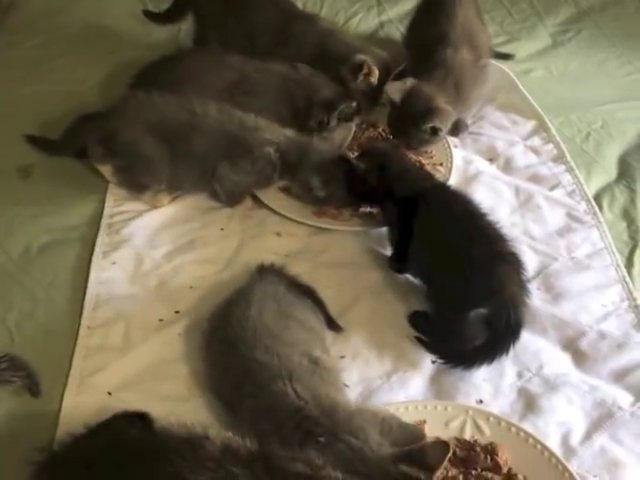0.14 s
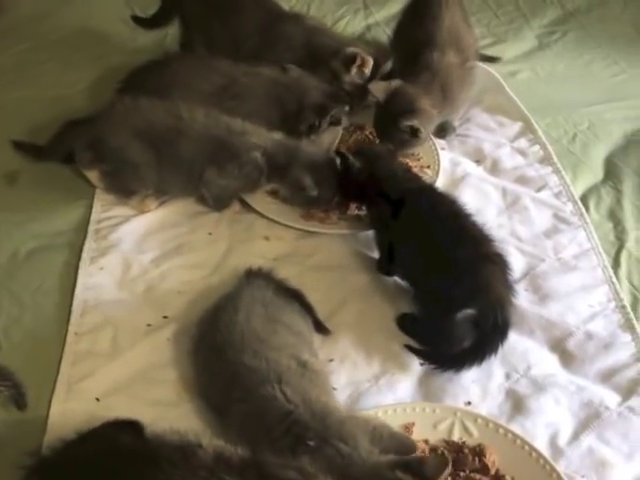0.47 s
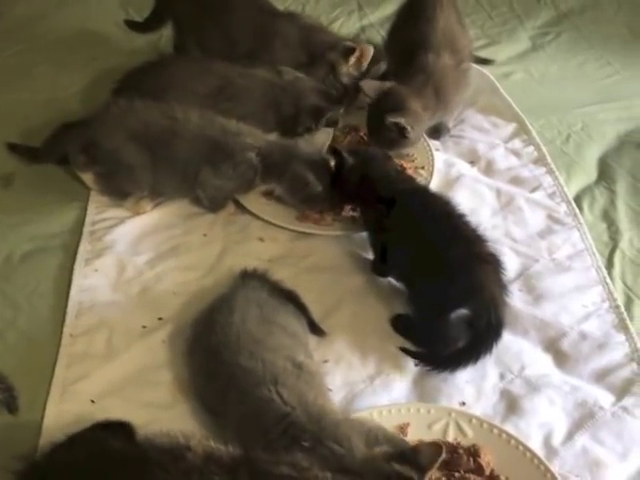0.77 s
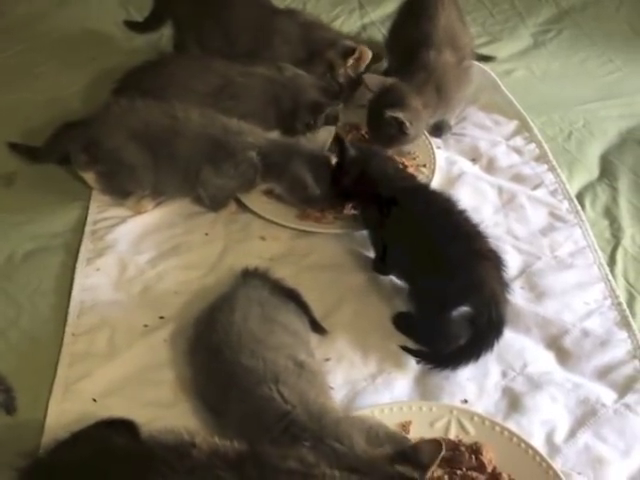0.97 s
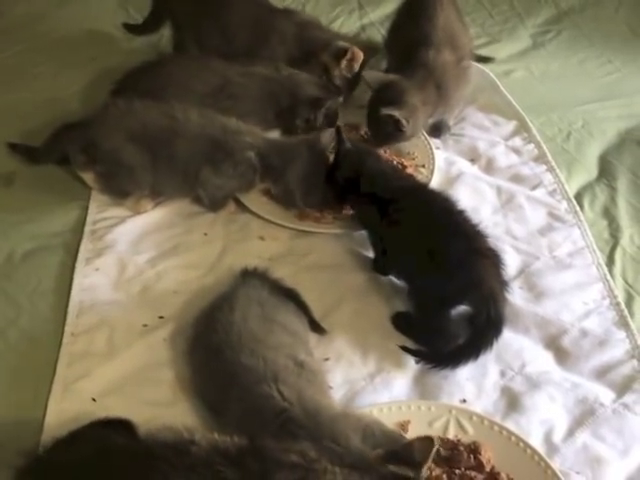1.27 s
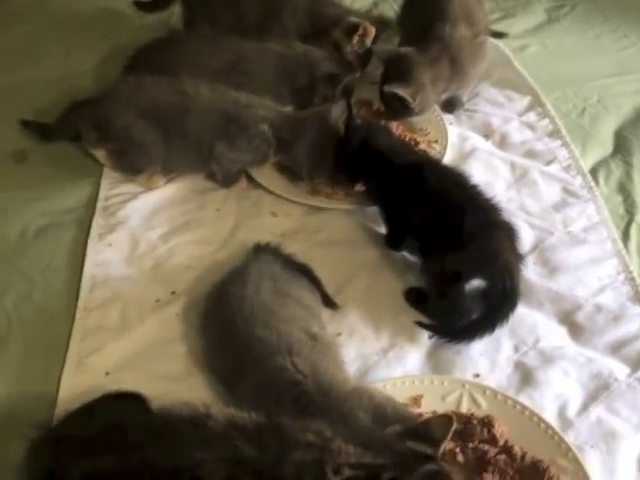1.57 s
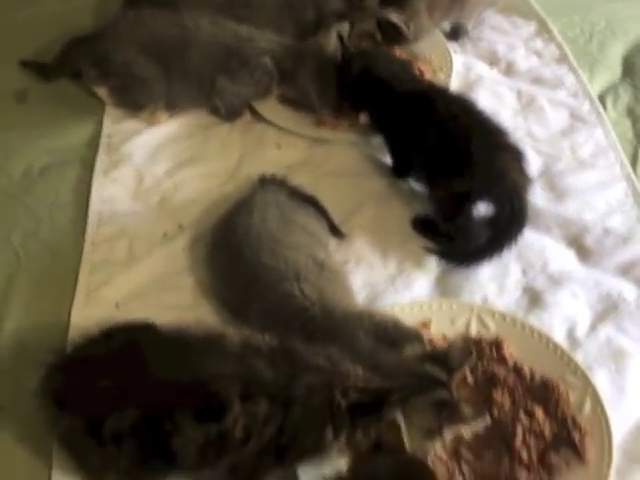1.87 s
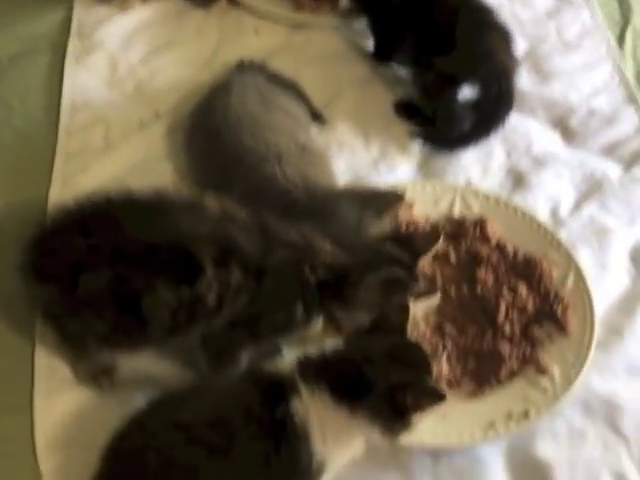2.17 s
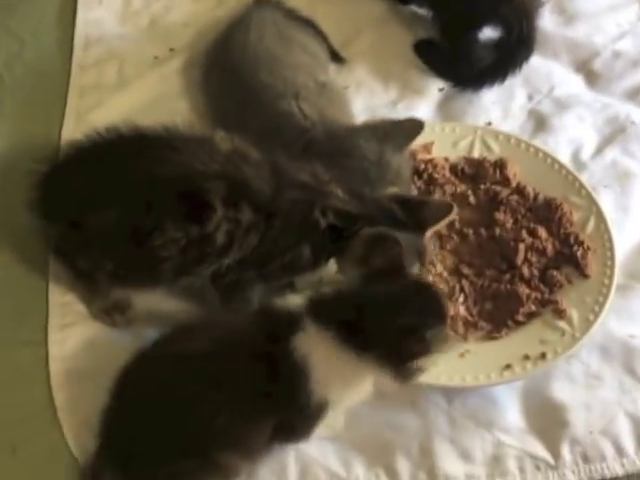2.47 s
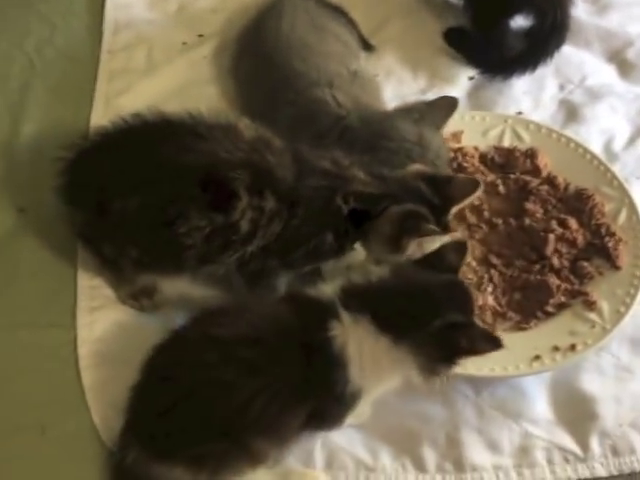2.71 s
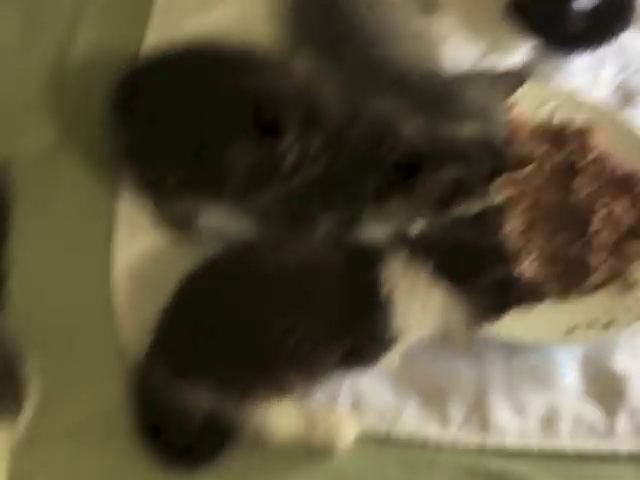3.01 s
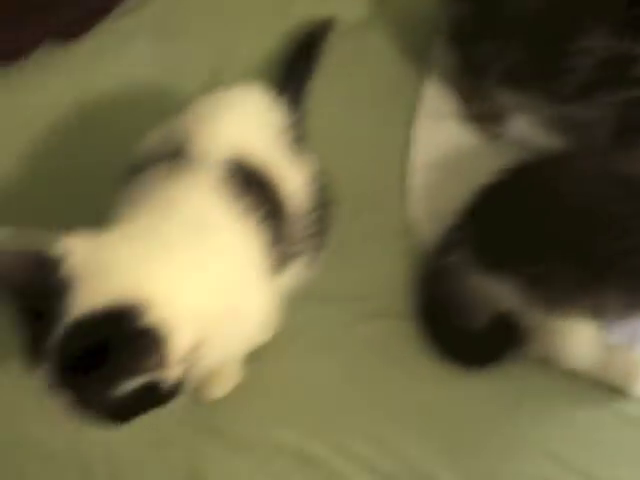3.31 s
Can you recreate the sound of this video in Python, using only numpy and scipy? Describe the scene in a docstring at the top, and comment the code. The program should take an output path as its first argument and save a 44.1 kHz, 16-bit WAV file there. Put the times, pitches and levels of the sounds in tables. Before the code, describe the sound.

Wet eating sounds of kittens, clicking, squelching and nibbling close up in a small humming room

```python
"""Kittens eat wet food from plates on the floor of a small room, close to a hand-held camera.
From the start an appliance hums in wavering lines over noise rumble and hiss, with faint random nibbling.
Bursts of tiny pops make clicks and smacks, gliding bubbles squelch, and short noise knocks nudge the plates.
Bites snap in damped resonances near 1.0, 2.5 and 3.2 s; the hum sinks after 1.9 s as the camera moves away,
and a dull noise rustle joins at 3.0 s. The floor and the walls answer every sound of the kittens."""
import sys
import numpy as np
from scipy import signal
from scipy.fft import rfft, irfft, next_fast_len
from scipy.io import wavfile
from scipy.ndimage import map_coordinates

SR = 44100
rng = np.random.default_rng(int(sys.argv[2]) if len(sys.argv) > 2 else 0)


def store_pcm(level_fs):
    """Save levels as 16-bit WAV."""
    pcm = np.round(np.clip(level_fs, -1, 1) * 32767).astype(np.int16)
    wavfile.write(sys.argv[1], SR, np.atleast_2d(pcm).T)


N = 152145
T = np.arange(N) / SR

# Steady lines of the appliance. Each row: frequency in Hz, rms level in dB.
HUM_LINES = [(59, -47), (120, -44), (221.5, -60.5), (240, -58), (304, -73), (341, -65), (397.5, -75.5),
             (480, -78), (599.5, -73)]
# Fade of those lines as the camera moves away. Each row: time in seconds, gain in dB.
HUM_FADE = [(0, 0), (1.0, 0.5), (1.9, 0), (2.7, -1.9), (3.45, -3.5)]
# Colour of the appliance's rumble. Each row: frequency in Hz, relative level in dB.
RUMBLE_COLOUR = [(20, -35), (32, -16), (42, 0), (56, 6), (75, -4.5), (108, 3.5), (135, -6.5), (168, -3.5),
                 (190, -9), (220, -5.5), (260, -12), (315, -5), (390, -14), (450, -20.5), (700, -27.5),
                 (1500, -36.5)]
# Colour of the room and microphone hiss. Each row: frequency in Hz, relative level in dB.
HISS_COLOUR = [(100, -12.5), (600, 2.5), (1200, 7), (2100, 5), (3000, 6.5), (6000, -3), (9000, -8.5),
               (11000, -7), (15500, -7)]
# Rustle as the camera swings away. Each row: time in seconds, level in dB.
SWING_LEVEL = [(3.0, -68), (3.2, -55), (3.3, -58), (3.45, -62)]
# Soft knocks of paws and muzzles against plate and sheet.
# Each row: start in seconds, decay in seconds, level in dB of the noise before its envelope.
NUDGES = [(.085, 0.011, -48.5), (.568, .006, -61), (.747, 0.017, -49), (1.853, 0.0057, -45),
          (2.598, 0.0045, -47), (2.674, 0.018, -57), (2.912, 0.032, -49), (3.184, 0.0067, -36.5),
          (3.334, 0.0056, -40), (3.372, 0.014, -44.5)]
# Squelches in the mouth. Each row: start in seconds, length in seconds, first pitch in Hz,
# last pitch in Hz, level in dB as an rms over that length.
SQUELCHES = [(.083, .011, 3880, 3830, -33.5), (0.153, .035, 2150, 2010, -49.5),
             (.397, 0.006, 2800, 2520, -47.5), (0.426, 0.033, 1920, 1740, -53),
             (0.488, 0.042, 5400, 5200, -60), (0.52, 0.027, 3460, 3340, -53), (0.582, .02, 1790, 1950, -56),
             (0.616, 0.033, 7400, 7500, -59.5), (0.769, 0.033, 2200, 2100, -58),
             (1.095, .035, 2250, 2140, -47.5), (1.278, 0.036, 2540, 2170, -52),
             (1.312, 0.025, 2030, 1860, -45.5), (1.351, 0.015, 3100, 3300, -46),
             (1.357, .018, 1880, 1860, -52), (1.382, 0.034, 2280, 2150, -50.5),
             (1.642, 0.008, 2850, 3160, -44.5), (1.724, .035, 2540, 2270, -53),
             (1.768, 0.053, 2240, 1990, -50), (1.776, 0.051, 1630, 1340, -53.5),
             (1.835, 0.031, 2240, 2050, -52), (1.916, 0.0091, 3020, 3200, -44),
             (1.943, 0.06, 3150, 2940, -52), (2.202, .05, 2300, 2050, -59.5),
             (2.228, .004, 2180, 1880, -46), (2.293, .03, 1920, 1860, -56.5),
             (2.44, 0.035, 3700, 3700, -57), (2.782, .022, 3180, 3360, -53.5),
             (2.799, .07, 2220, 2100, -53.5), (3.13, 0.011, 3180, 3400, -42.5),
             (3.138, 0.035, 3700, 3540, -48), (3.288, 0.0057, 2600, 2750, -41.5),
             (3.368, 0.011, 1510, 1960, -39.5)]
# The four bands of a mouth sound. Each row: low edge in Hz, high edge in Hz.
MOUTH_BANDS = [(1450, 2540), (3200, 5080), (5300, 9620), (9800, 14800)]
# Wet smacks, and a few brief clicks that lead into or follow the loud bites. Each row: start in seconds, decay
# in seconds, then the level in dB of each mouth band from low to high, as an rms over one decay time.
SMACKS = [(.063, 0.024, -50.5, -47, -55, -51), (.082, 0.0085, -45, -45, -43.5, -36.5),
          (0.331, 0.013, -53.5, -51.5, -55, -67), (.635, 0.035, -54.5, -59, -68, -70),
          (0.745, 0.015, -41.5, -48, -56.5, -54.5), (0.799, 0.013, -51.5, -67, -58, -56),
          (.91, .012, -60, -56, -58, -68), (.955, 0.0057, -51, -56, -56, -51),
          (0.9869, 0.0022, -28, -33, -35, -42), (1.008, 0.0049, -46, -46, -41, -53),
          (1.09, 0.029, -54, -58, -59, -54.5), (1.43, 0.023, -58.5, -51.5, -73, -71),
          (1.509, 0.012, -57, -50, -55.5, -60), (1.568, 0.0089, -59, -52.5, -73, -72),
          (1.685, 0.007, -47.5, -47, -53, -48), (2.493, 0.0015, -51, -48, -53, -46),
          (2.667, 0.016, -44.5, -48, -52.5, -53), (2.912, 0.02, -40.5, -73, -61, -49.5),
          (3.035, 0.02, -55, -52.5, -56, -62), (3.135, 0.0059, -47, -56, -56, -58),
          (3.1653, 0.0017, -43, -52, -46, -53), (3.178, 0.0015, -34, -44, -37, -59),
          (3.182, 0.005, -42.5, -38, -35, -35.5), (3.356, 0.012, -49.5, -46.5, -45.5, -57),
          (3.375, 0.018, -43, -47.5, -54.5, -55)]
# Tongue and tooth clicks. Each row: start in seconds, a peak level in dB that is not used,
# then the level in dB of each mouth band from low to high, as an rms over one decay time.
CLICKS = [(0.2369, -38, -45.5, -43.5, -76, -84), (0.3146, -33, -43, -36, -42, -51),
          (0.352, -31, -47, -60, -39, -48), (0.3614, -34, -56, -72, -45.5, -36.5),
          (0.5657, -36, -40.5, -53, -45, -47), (0.6926, -36, -44.5, -43.5, -47, -49),
          (0.8637, -35, -41, -50, -49, -64), (0.9865, -13, -38, -42, -30.5, -20.5),
          (1.262, -34, -72, -75, -57, -42.5), (1.3412, -31, -59, -45, -41, -51),
          (1.5051, -38, -49.5, -42.5, -51, -50), (1.6596, -29, -49, -37, -37, -37),
          (1.6844, -30, -54, -36, -36, -48), (1.8525, -39, -42, -48, -48, -48),
          (2.0242, -34, -46, -39.5, -38, -40.5), (2.0421, -27, -45, -35, -40.5, -55),
          (2.163, -39, -77, -81, -55, -46.5), (2.1874, -41, -71, -67, -48, -66),
          (2.336, -38, -64, -44.5, -57, -49), (2.4992, -16, -48.5, -28, -47, -47),
          (2.595, -42, -46, -72, -69, -68), (2.7551, -39, -48, -44, -66, -72),
          (2.8552, -29, -46, -39.5, -38, -39.5), (2.9066, -24, -33.5, -29.5, -41, -37),
          (2.9184, -25, -36, -37.5, -43, -42), (2.9841, -38, -41, -62, -51, -47),
          (3.1035, -36, -46.5, -38.5, -61, -56), (3.1802, -13, -30, -27.5, -24, -49),
          (3.3, -30, -56, -54, -36, -36.5), (3.3343, -36, -41.5, -46, -44, -45)]
# Resonances rung by the loud bites. Each row: start in seconds, frequency in Hz,
# level in dB before attack and doubling, time in seconds to fall by 60 dB.
BITE_RINGS = [(0.9871, 1837, -20, 0.0086), (.9875, 2520, -21.5, 0.0057), (.9876, 8450, -16.5, 0.0041),
              (.9875, 6810, -24, 0.005), (.9914, 11600, -11.5, 0.0043), (1.0078, 8100, -30.5, 0.014),
              (2.4993, 2400, -26.5, 0.0092), (2.4996, 3980, -23, 0.0084), (2.5003, 4470, -20, 0.0075),
              (2.4992, 5670, -19, 0.01), (2.4993, 8240, -23, 0.0048), (2.504, 4270, -17.5, 0.0072),
              (3.1797, 8440, -16.5, 0.0056), (3.1806, 7990, -14.5, 0.0064), (3.183, 5600, -5, 0.002),
              (3.183, 1450, -29, 0.013), (3.1859, 1900, -18, 0.0035), (3.1852, 6920, -15, 0.0041),
              (3.1856, 5250, -15.5, 0.0034)]
# Decay of the room. Each row: frequency in Hz, time in seconds to fall by 60 dB.
ROOM_DECAY = [(300, 0.1), (2000, 0.28), (6000, 0.24), (14000, 0.18)]
# Tone of the small microphone. Each row: frequency in Hz, gain in dB.
MICROPHONE_TONE = [(20, 6), (40, -0.5), (1000, -0.5), (2400, -2.5), (2950, -7.5), (3800, -4.5),
                   (9300, -1.5), (10500, -7.5), (11800, -3.5), (14000, -10), (15900, -8)]

HUM_WAVER_DB, HUM_DRIFT_RAD = 0.5, 0.04
RUMBLE_DB, HISS_DB = -46, -57.5
NIBBLES_PER_S, NIBBLE_DB, NIBBLE_HZ = 52, -64, 7000
MUNCHES_PER_S, MUNCH_DB, MUNCH_HZ = 160, -69.5, 2034
BUBBLES_PER_S, BUBBLE_SCATTER, BUBBLE_CYCLES, BUBBLE_SPREAD_DB = 420, 0.061, 5.5, 3.5
POPS_PER_S, POP_SPREAD_DB = 1300, 4.5
SOFT_RISE_S = 0.0038  # shared by smacks and nudges
CLICK_RISE_S, CLICK_DECAY_S = 0.0011, 0.0014
BITE_RISE_S, BITE_ROUGH_RAD, BITE_ROUGH_PER_S = 0.00062, 0.23, 1455
FLOOR_S, FLOOR_DB, ROOM_DB = 0.0044, -11.5, -9
TOP_HZ = 15900  # band limit of the camera


def amp(db):
    """Turn decibels into gain."""
    return 10 ** (np.asarray(db) / 20)


def unit(x):
    """Scale a sound to rms 1."""
    return x / np.sqrt(np.mean(x ** 2) + 1e-20)


def along(points, hz):
    """Read a curve of frequency points on a log axis."""
    f, v = np.transpose(points)
    return np.interp(np.log(hz + 1), np.log(f + 1), v)


def wobble(rate, times=T):
    """Draw a smooth random curve with the given number of knots a second."""
    knots = rng.standard_normal(int(len(times) * rate / SR) + 4)
    return map_coordinates(knots, [times * rate])


def filtered(x, response):
    """Shape a sound by a gain that depends on frequency."""
    m = next_fast_len(N + SR // 2)
    return irfft(rfft(x, m) * response(np.fft.rfftfreq(m, 1 / SR)), m)[:N]


def noise(colour):
    """Make coloured noise of rms 1."""
    return unit(filtered(rng.standard_normal(N), lambda hz: amp(along(colour, hz))))


def band(x, edges):
    """Keep one band, filtering forward in time only."""
    return signal.sosfilt(signal.butter(3, edges, 'bandpass', fs=SR, output='sos'), x)


def add(track, s, sound):
    """Mix a sound into the track at s seconds."""
    part = track[max(round(s * SR), 0):][:len(sound)]
    part += sound[:len(part)]


def grains(times, hz, gains, cycles, size=500):
    """Ring damped sines that fall by 1/e in the given number of cycles."""
    k = np.arange(size)
    turns = hz[:, None] * k / SR
    envelope = np.exp(-turns / cycles) * (1 - np.exp(-2 * turns))
    waves = gains[:, None] * np.sin(2 * np.pi * turns) * envelope
    positions = (times * SR).astype(int)[:, None] + k
    return np.bincount(positions.ravel(), waves.ravel(), N)[:N]


def hiss():
    """Room and microphone give a steady coloured noise."""
    return amp(HISS_DB) * noise(HISS_COLOUR)


def appliance():
    """Motor and mains lines waver slightly in level and phase over a low noise rumble."""
    lines = np.zeros(N)
    for hz, db in HUM_LINES:
        gain = amp(db + HUM_WAVER_DB * wobble(4.68)) * np.sqrt(2)  # rms to peak
        phase = 2 * np.pi * (hz * T + rng.random()) + HUM_DRIFT_RAD * wobble(2.9)
        lines += gain * np.sin(phase)
    fade = amp(np.interp(T, *np.transpose(HUM_FADE)))
    return lines * fade + amp(RUMBLE_DB) * noise(RUMBLE_COLOUR)


def handling():
    """The hand on the turning camera rubs out a dull band of noise."""
    level = amp(np.interp(T, *np.transpose(SWING_LEVEL), left=-120))
    return level * unit(band(rng.standard_normal(N), (170, 455)))


def litter(rate, centre_hz, scatter, cycles):
    """Faint mouth sounds are short damped rings at random moments, pitches and strengths."""
    when, pitch, strength = rng.random((int(rate * N / SR), 3)).T
    hz = np.minimum(centre_hz * np.exp(scatter * (2 * pitch - 1)), TOP_HZ)
    gains = amp(np.log(strength))  # mostly within a few dB of the strongest
    return unit(grains(when * N / SR, hz, gains, cycles))


def other_kittens():
    """The other kittens tick brightly with nibbles and chew in a lower, denser patter."""
    nibbles = litter(NIBBLES_PER_S, NIBBLE_HZ, scatter=1.0, cycles=2.25)
    munching = litter(MUNCHES_PER_S, MUNCH_HZ, scatter=0.26, cycles=1)
    return amp(NIBBLE_DB) * nibbles + amp(MUNCH_DB) * munching


def nudges():
    """Dull, brief knocks are bursts of band noise without any ring."""
    out, t = np.zeros(N), np.arange(SR // 8) / SR
    for s, decay_s, db in NUDGES:
        shape = (1 - np.exp(-t / SOFT_RISE_S)) * np.exp(-t / decay_s)
        thud = unit(band(rng.standard_normal(len(t)), (590, 1340)))
        add(out, s, amp(db) * shape * thud)
    return out


def squelches():
    """Tiny bubbles ring a mouth cavity whose pitch glides as the jaw moves."""
    out = np.zeros(N)
    for s, length, first_hz, last_hz, db in SQUELCHES:
        count = max(int(length * BUBBLES_PER_S), 2)
        place = (np.arange(count) + rng.random(count)) / count  # one bubble in each equal slice
        glide = first_hz + (last_hz - first_hz) * place
        hz = glide * np.exp(BUBBLE_SCATTER * rng.standard_normal(count))
        gains = amp(BUBBLE_SPREAD_DB * rng.standard_normal(count))
        run = grains(s + place * length, hz, gains, BUBBLE_CYCLES)
        out += amp(db) * unit(run) * np.sqrt(length * SR / N)
    return out


def wet_burst(rise_s, decay_s, levels_db, size=6000):
    """A film of moisture tears in a dying run of tiny pops, coloured by the mouth."""
    t = np.arange(size) / SR
    struck = rng.random(size) < POPS_PER_S / SR
    pops = struck * rng.choice([-1, 1], size) * amp(POP_SPREAD_DB * rng.standard_normal(size))
    shape = (1 - np.exp(-t / rise_s)) * np.exp(-t / decay_s)
    tear = (pops + 0.14 * rng.standard_normal(size)) * shape  # a little breath of noise between pops
    coloured = sum(amp(db) * unit(band(tear, edges)) for edges, db in zip(MOUTH_BANDS, levels_db))
    return coloured * np.sqrt(decay_s * SR / size)


def smacks():
    """Lips part slowly, so their wet tear swells and dies more gently; a few very short rows are brief clicks
    that lead into or follow a loud bite."""
    out = np.zeros(N)
    for s, decay_s, *levels in SMACKS:
        add(out, s, wet_burst(SOFT_RISE_S, decay_s, levels))
    return out


def clicks():
    """Tongue and teeth part at once, in a very short wet tear."""
    out = np.zeros(N)
    for s, _, *levels in CLICKS:
        add(out, s, wet_burst(CLICK_RISE_S, CLICK_DECAY_S, levels))
    return out


def bites():
    """Each loud bite rings a few heavily damped resonances, roughened by phase jitter."""
    out, t = np.zeros(N), np.arange(SR // 20) / SR
    for s, hz, db, t60 in BITE_RINGS:
        slip = BITE_ROUGH_RAD * wobble(BITE_ROUGH_PER_S, t)
        envelope = 2 * amp(db - 60 * t / t60) * (1 - np.exp(-t / BITE_RISE_S))
        add(out, s, envelope * np.sin(2 * np.pi * hz * t + slip))
    return out


def room(x):
    """One bounce off the floor, then a short diffuse tail, drawn anew every third of a second."""
    out = x.copy()
    add(out, FLOOR_S, amp(FLOOR_DB) * x)
    step = SR // 3
    for start in range(0, N, step):
        hz, t, z = signal.stft(rng.standard_normal(step), SR, nperseg=256)
        decay = amp(-60 * t / along(ROOM_DECAY, hz)[:, None])
        tail = signal.istft(z * decay, SR, nperseg=256)[1]
        answer = signal.fftconvolve(x[start:start + step], tail / np.linalg.norm(tail))
        add(out, start / SR + FLOOR_S, amp(ROOM_DB) * answer)
    return out


def scene():
    """The feeding kittens sound in the room, over hum, rustle and hiss."""
    background = hiss() + appliance() + handling()
    kittens = other_kittens() + nudges() + squelches() + smacks() + clicks() + bites()
    return (background + room(kittens))[None]


def record(dry):
    """The small microphone colours the tone; the camera keeps nothing above its band limit."""
    return filtered(dry[0], lambda hz: amp(along(MICROPHONE_TONE, hz)) * (hz < TOP_HZ))[None]


dry = scene()
out = record(dry)
store_pcm(out)
```